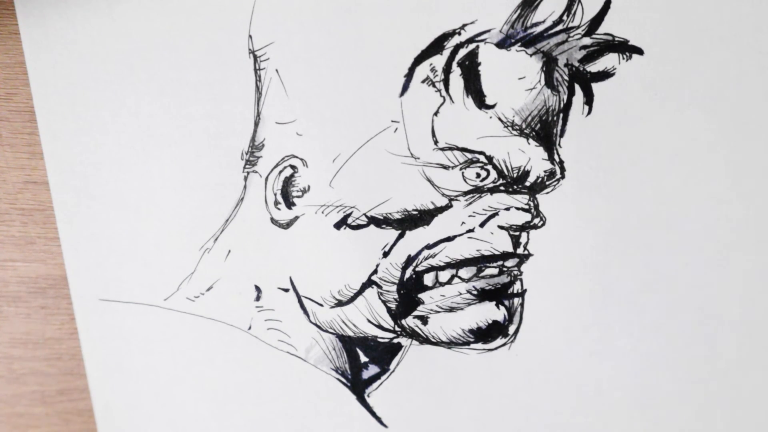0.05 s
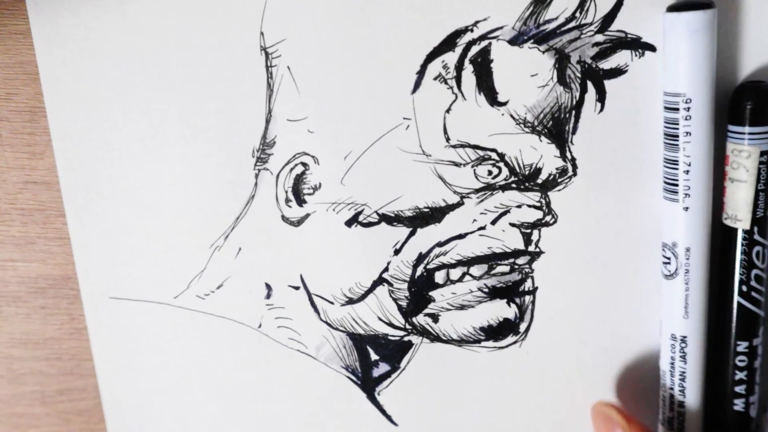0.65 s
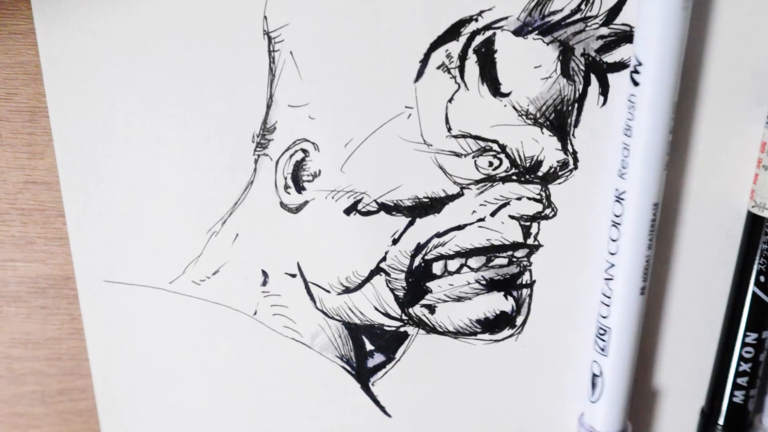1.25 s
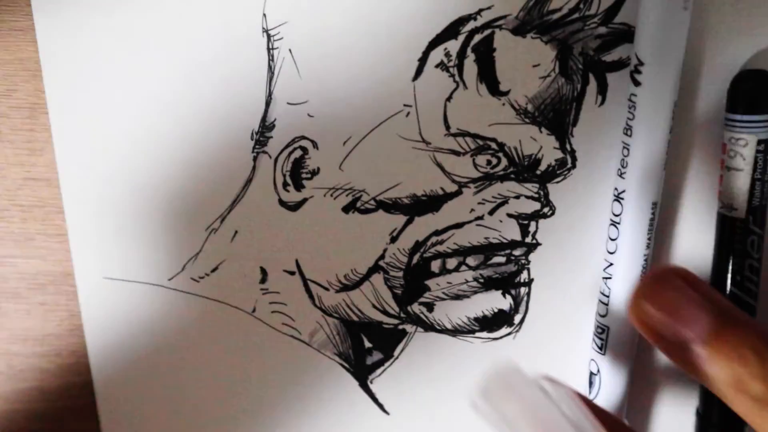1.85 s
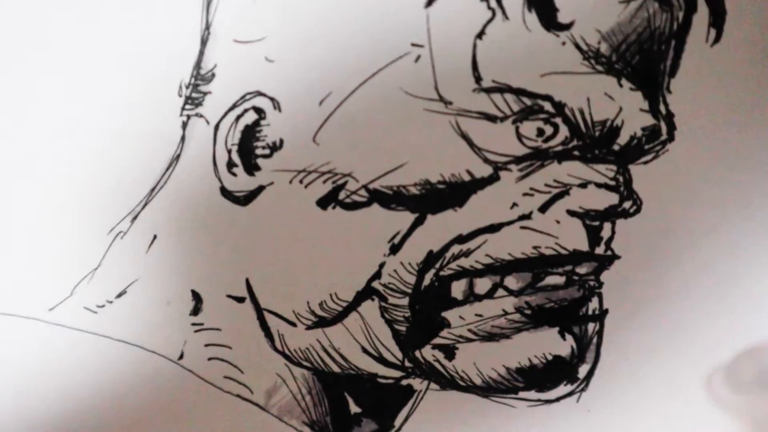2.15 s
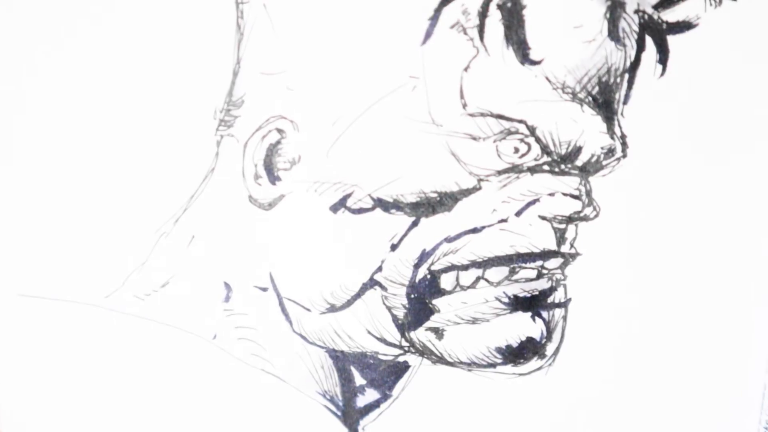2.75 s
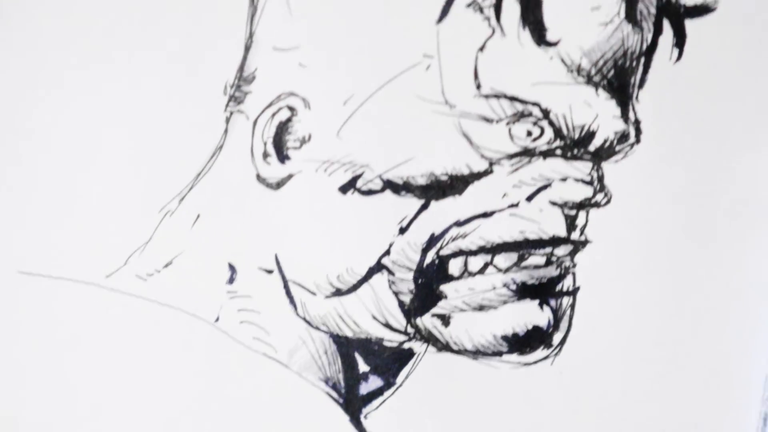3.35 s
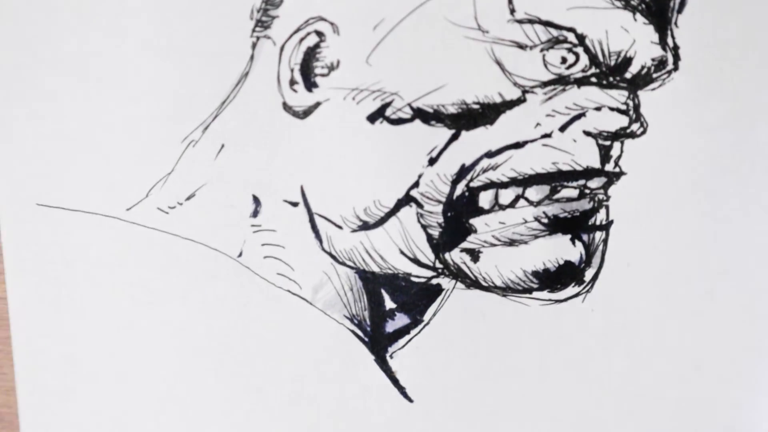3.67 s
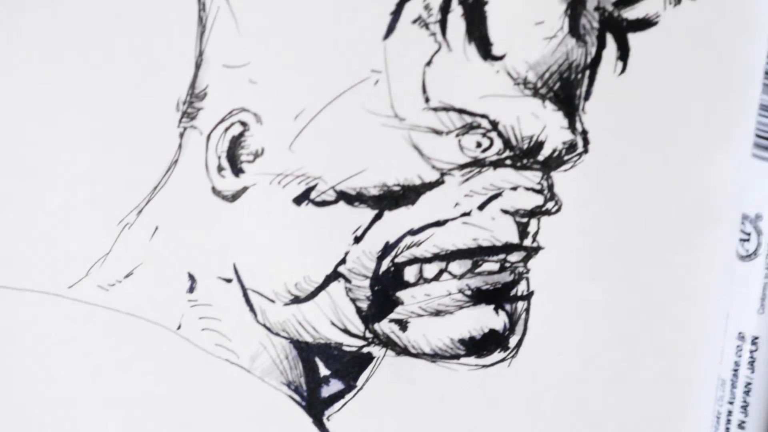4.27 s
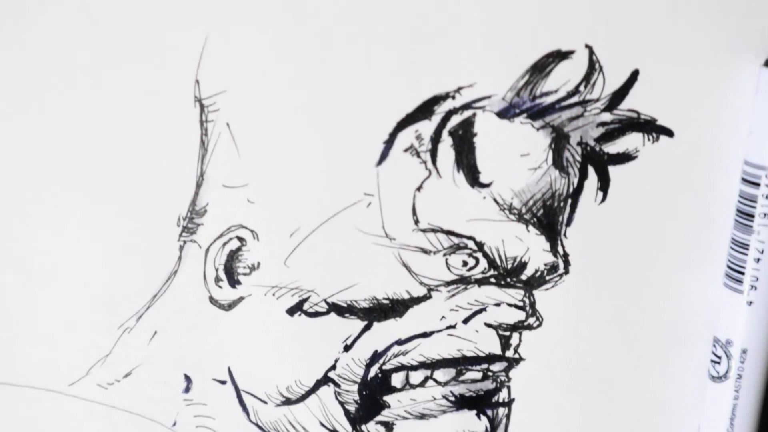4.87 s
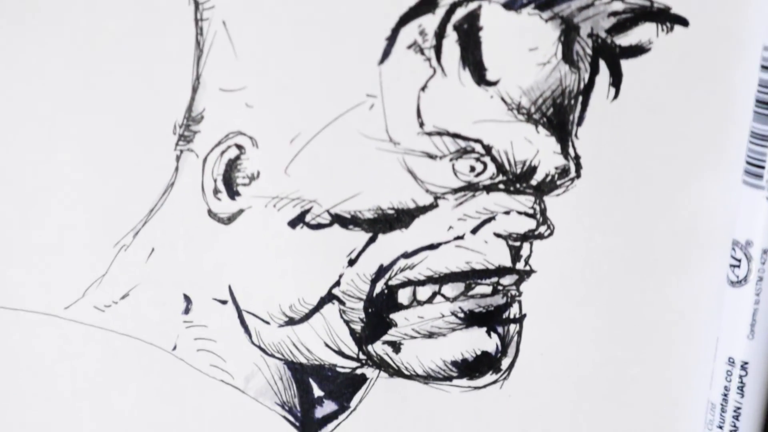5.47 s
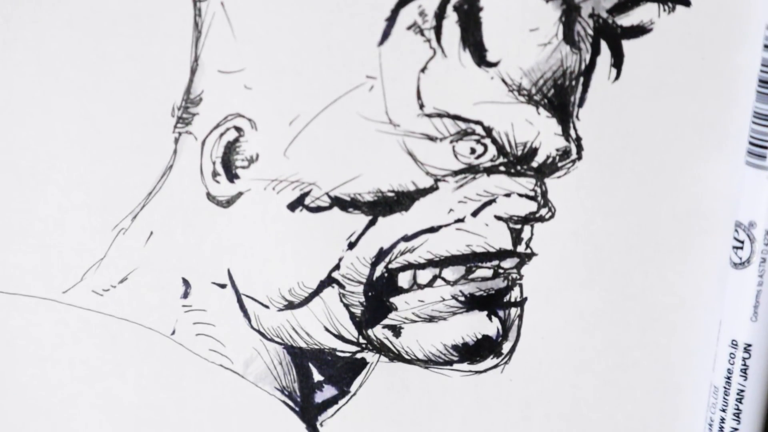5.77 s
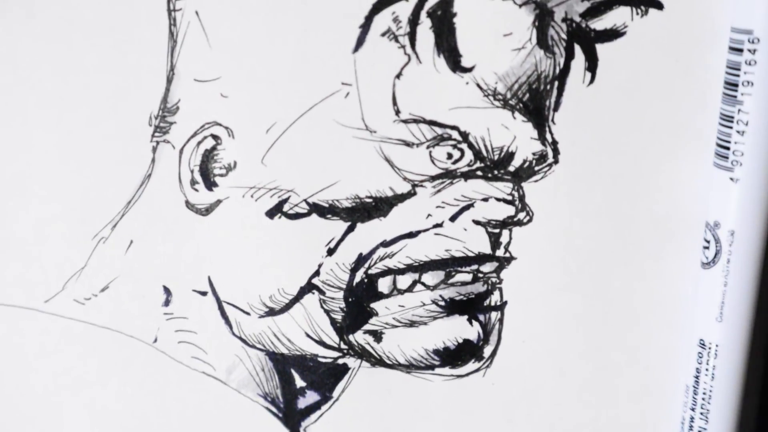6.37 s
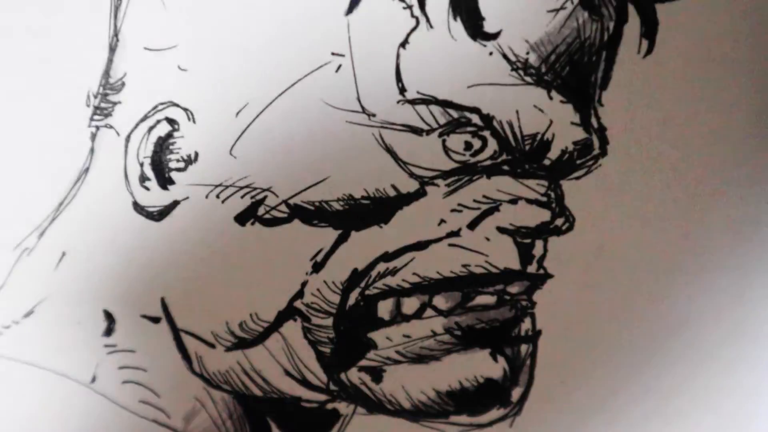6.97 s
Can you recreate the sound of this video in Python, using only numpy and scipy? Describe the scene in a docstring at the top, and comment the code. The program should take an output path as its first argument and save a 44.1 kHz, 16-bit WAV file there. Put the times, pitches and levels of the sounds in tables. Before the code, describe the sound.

A soft brush of paper opens the sound. From about 0.3 to 0.6 seconds, plastic pens clatter onto a sheet on a wooden desk, a quick run of woody knocks and bright clicks that is the loudest moment. Lighter taps follow until around 2 seconds as the pens are nudged. Between 1.4 and 2.9 seconds there are short gritty scrapes, dry finger swishes and tiny plastic creaks over a faint low rumble. At 3 seconds a click and a low thud come from a bumped stand. From about 3.3 to 6.4 seconds the sheet is pushed across the desk in several soft strokes, with a woody drone and a light hiss of fingers on paper. Near 6.8 to 7 seconds, low thuds and brief scrapes return as the pens are handled again. Everything is close and almost mono, in a small, quiet room.

```python
"""A soft brush of paper, then two plastic pens clatter onto a drawing sheet on a wooden desk: each blow
rings the wood and clicks in the barrel. The pens are nudged along with gritty scrapes and tiny creaks,
and a hand bumps a phone stand just above with low thuds. The sheet is pushed in short strokes, droning
through the desk top while fingers hiss over its fibres, and the pens are picked up again.
The room is small and quiet, the image almost mono."""
import sys
import numpy as np
from scipy import signal
from scipy.fft import rfft, irfft
from scipy.io import wavfile

SR = 44100
rng = np.random.default_rng(int(sys.argv[2]) if len(sys.argv) > 2 else 0)


def wrap_up_sound(samples):
    """Save the sound to the file named by the first command line argument, as 16-bit audio."""
    columns = np.atleast_2d(samples).T
    # keep every value between -1 and 1, then stretch to whole-number steps
    tamed = np.clip(columns, -1, 1)
    steps = np.round(tamed * 32767).astype(np.int16)
    wavfile.write(sys.argv[1], SR, steps)


N = 314212
TIME = np.arange(N) / SR
RING_TIME = TIME[:SR // 2]  # half a second for each hit to ring out

# Levels in the tables are relative: each layer sets its own gain on top.
# Knocks and clicks: pens hit the desk, and the phone stand clicks once at 2.67 s. Each row: start in
# seconds, knock level in dB, tick level in dB, contact hardness as a low-pass cutoff in Hz.
KNOCKS_AND_CLICKS = [(0.2885, -9, -22, 3660), (0.3181, -8.5, -9, 6950), (0.3329, -15.5, -22, 4000),
                     (0.3542, -11.5, -7.5, 5000), (.3610, -13.5, -25, 6500), (0.3871, -31, -10, 8000),
                     (0.4026, -2, -6.5, 2410), (0.413, -15, -14, 3000), (0.454, -36, -20, 6000),
                     (0.46, -2, -19, 5000), (.4729, -10.5, -16.5, 5000), (0.518, -16, -12, 5000),
                     (0.5241, -2.5, -10, 5700), (0.582, -47, -26.5, 5030), (0.6343, -32, -23.5, 3500),
                     (.6433, -37, -28, 2490), (.6520, -28, -37, 2000), (0.66, -48, -26, 3500),
                     (0.8355, -38, -27.5, 2200), (.8425, -20, -42, 780), (0.857, -25.5, -23.5, 1440),
                     (0.8873, -15, -25.5, 1800), (0.8934, -19, -40, 2870), (.8980, -20.5, -41, 2380),
                     (1.0334, -24, -25, 2970), (1.0349, -7, -24.5, 2620), (1.1422, -24, -25, 858),
                     (1.422, -26.5, -27.5, 1000), (1.8424, -43, -30, 4000), (1.8791, -11.5, -35, 2600),
                     (1.951, -40, -29.5, 1500), (1.993, -36, -29, 1500), (2.0660, -26.5, -50, 1000),
                     (2.284, -27, -50, 920), (2.6668, -20, -22.5, 700), (6.778, -30, -45, 700),
                     (6.961, -38, -38, 1200)]
# The ring of desk top and pen. Each row: pitch in Hz, level in dB, 60 dB decay time in seconds.
DESK_MODES = [(113, -12, .28), (283, -7, .19), (415, -4, .11), (540, -5, .11), (696, -1, .13),
              (826, -4, .13), (967, 1, .13), (1112, -2, .12), (1260, -7, .1), (1375, -6, .1),
              (1630, -1, .1), (1925, 1, .1), (2200, 1, .1), (2420, -1, .09), (2582, 0, .08), (2773, 1, .07),
              (2980, 1, .045), (3700, -4, .04), (4560, -5, .04), (5150, -9, .05), (5852, -6, .045)]
# The ping of the hollow barrel. Each row: pitch in Hz, level in dB, 60 dB decay time in seconds.
BARREL_MODES = [(2556, 13, 0.02), (3720, -1, 0.1), (4300, -5, 0.044), (5730, -7, .04)]
# The stand, shaken by a knock. Each row: pitch in Hz, level in dB, 60 dB decay time in seconds.
SHAKE_MODES = [(107.3, 7, 0.27), (675, 8, .15)]
# The tone of a knock's dense tail. Each row: frequency in Hz, level in dB.
TAIL_COLOUR = [(60, -20), (150, -17.5), (280, -8), (700, -9.5), (1400, -11), (2600, -10.5), (3500, -13.5),
               (5500, -12), (7000, -26), (15000, -43)]
# How long that tail hangs on. Each row: frequency in Hz, 60 dB decay time in seconds.
TAIL_DECAYS = [(200, 0.22), (800, 0.068), (3000, 0.073), (6000, 0.051), (14000, 0.14)]
# The bright click of cap and barrel. Each row: frequency in Hz, level in dB.
TICK_COLOUR = [(800, -50), (2800, -20), (4000, 9), (5200, -6), (7000, -2.5), (9000, -0.5), (10300, -0.5),
               (13500, 0), (16000, -12)]

# The stand or desk is bumped. Each row: start in seconds, level in dB, pitch in Hz,
# 60 dB decay time in seconds, attack in seconds.
BUMPS = [(1.414, -23.5, 138, 0.074, 0.0063), (1.990, -26, 119, 0.049, 0.0011),
         (2.624, -27.5, 114, 0.086, 0.0025), (3.001, -17, 94, 0.31, 0.0051), (3.257, -26, 157, 0.13, 0.015),
         (3.261, -18.5, 110, 0.2, 0.017), (6.751, -18, 77.4, 0.081, 0.016),
         (6.864, -28, 115, 0.081, 0.0076), (6.964, -19.5, 85, 0.062, 0.0074)]
# The stand's upper ring. Each row: pitch in Hz, level in dB, 60 dB decay time in seconds.
STAND_MODES = [(320, -16, 0.16), (397, -18, 0.12), (543, -20, 0.12), (677, -4.5, 0.11)]
# The hand leans on the stand and rocks it. Each row: start in seconds, level in dB.
LEANS = [(1.956, -33), (1.981, -28), (2.363, -29), (2.440, -25), (2.598, -27), (3.003, -24), (3.195, -30.5),
         (6.988, -25)]

# The sheet is pushed over the desk. Each row: start in seconds, length in seconds, drone level in dB,
# hiss level in dB, level in dB of the jolt as it breaks loose.
PUSHES = [(3.303, 0.034, -46.5, -67, -62), (3.418, 0.13, -43, -45, -69), (3.574, 0.093, -41, -61, -74),
          (3.72, 0.15, -50, -67, -65), (3.95, 0.77, -43, -53.5, -44.5), (4.74, 0.36, -45.5, -74, -57),
          (5.238, 0.44, -42.5, -48, -43.5), (6, 0.1, -44.5, -57, -40.5), (6.141, 0.15, -49.5, -70, -43.5),
          (6.322, 0.027, -50.5, -70, -68), (6.439, 0.02, -48, -52, -64)]
# Hand and pens shuffle on the sheet. Each row: peak time, rise and fall in seconds,
# drone level in dB, hiss level in dB.
SHUFFLES = [(.03, 0.12, 0.27, -58.5, -50.5), (.47, 0.063, 0.066, -36.5, -47),
            (.65, 0.043, 0.03, -43.5, -72), (1.14, 0.4, 0.18, -51, -50), (1.8, .03, 0.12, -42, -64),
            (2.15, 0.18, 0.78, -58, -52), (6.8, 0.036, 0.13, -45.5, -57), (7.12, 0.091, 0.13, -50, -52)]
# The woody drone of the sliding sheet. Each row: frequency in Hz, level in dB.
SLIDE_COLOUR = [(120, -19), (200, -28.5), (280, -4), (320, -10), (390, 1), (540, 1), (700, -1.5),
                (950, -10), (1100, -15.5), (1400, -18), (1750, -19), (2300, -27), (4000, -28), (15000, -33)]
# A narrow edge on that drone. Each row: centre in Hz, width in Hz, boost in dB.
SLIDE_RESONANCES = [(2890, 210, 12)]
# Short scrapes of pens and fingers. Each row: peak time, rise and fall in seconds, level in dB,
# brightness as a low-pass cutoff in Hz.
SCRAPES = [(1.462, 0.03, 0.011, -42, 5130), (1.530, 0.0091, 0.012, -43, 7000),
           (1.832, 0.034, 0.055, -34.5, 2180), (1.956, 0.0038, 0.017, -39, 1500),
           (2.004, 0.013, 0.039, -42, 5000), (2.180, 0.051, 0.018, -44, 2520),
           (2.226, 0.0074, 0.018, -41.5, 1800), (2.365, 0.033, 0.031, -42.5, 4500),
           (2.445, 0.014, 0.035, -45, 3000), (2.622, 0.029, 0.012, -37.5, 1680),
           (2.648, 0.0045, 0.0065, -38.5, 3500), (2.681, 0.0071, 0.0038, -36, 600),
           (2.773, 0.0083, 0.013, -43.5, 1370), (6.785, 0.017, 0.034, -33.5, 2400),
           (6.895, 0.017, 0.04, -41, 2000), (6.980, 0.013, 0.025, -43, 4500)]
# The grit of a scrape. Each row: frequency in Hz, level in dB.
SCRAPE_COLOUR = [(100, 5), (250, 4.5), (500, 4.5), (750, 2.5), (1100, -2.5), (2200, -7), (3300, -8),
                 (4200, -12), (6000, -17.5), (15000, -12)]

# The hiss of skin on paper. Each row: frequency in Hz, level in dB.
BRUSH_COLOUR = [(500, 4.5), (1200, 10), (2000, 11), (3000, 12), (4500, 9.5), (6500, 7.5), (9000, 7),
                (13500, 2.5), (16000, -2.5)]
# Dry swishes of skin and barrel. Each row: peak time, rise and fall in seconds, level in dB,
# centre of the sheen in Hz.
SWISHES = [(1.465, .022, 0.0081, -52, 12000), (1.565, 0.072, 0.065, -49, 13800),
           (1.730, 0.046, 0.043, -48.5, 5570), (2.025, 0.025, 0.0053, -51.5, 10500),
           (2.830, 0.014, 0.016, -54, 5570), (2.890, 0.02, 0.013, -43, 12000),
           (3.315, 0.0091, 0.0073, -54.5, 5560), (3.490, 0.092, 0.074, -50.5, 12200),
           (6.765, 0.0078, 0.012, -47, 7500), (6.980, 0.013, 0.013, -55.5, 7500)]
# Hollow fingertip rubs. Each row: peak time, rise and fall in seconds, level in dB.
RUBS = [(3.61, 0.026, 0.035, -55), (3.73, 0.042, 0.057, -51.5), (3.83, 0.018, 0.037, -57),
        (6.61, 0.0058, 0.0088, -56), (6.73, 0.088, 0.022, -53.5), (6.985, .012, 0.011, -51.5)]
# The hollow under the arched hand. Each row: centre in Hz, width in Hz, gain in dB.
RUB_RESONANCES = [(2550, 160, 9), (4400, 240, 9), (6500, 320, 4), (7300, 280, -2)]
# The woody click of a fingernail. Each row: frequency in Hz, level in dB.
NAIL_COLOUR = [(500, 5), (1100, 7), (1600, 3), (2300, 5), (2800, 0), (4000, -7.5), (8000, -11),
               (11000, -8.5), (16000, -20)]
# Gripped plastic creaks. Each row: peak time, rise and fall in seconds, level in dB, pitch in Hz.
CREAKS = [(2.621, 0.0036, 0.0042, -36, 1700), (2.646, 0.0022, 0.0049, -38.5, 2010),
          (2.669, 0.0009, 0.0046, -62, 3940), (6.763, 0.0046, 0.0072, -65, 5760),
          (6.809, .002, .003, -44, 2870)]
# The whistle of rubbed plastic. Each row: pitch in Hz, level in dB.
SQUEAK_PARTIALS = [(14000, -61), (15450, -66)]

# The hand rests on the desk and the stand sways. Each row: start and end in seconds, level in dB.
HAND_RESTS = [(0, 0.02, -45), (0.355, 1.364, -51), (1.382, 2.91, -47), (3.208, 3.403, -47.5),
              (3.694, 3.95, -56), (5.95, 6.4, -63), (6.745, 7.13, -42)]
# The rumble of that sway. Each row: frequency in Hz, level in dB.
SWAY_COLOUR = [(18, 4), (32, -45), (48, -0.5), (80, -0.5), (112, 0), (170, -11.5), (300, -22), (800, -61)]
# The room tone. Each row: frequency in Hz, level in dB.
ROOM_COLOUR = [(18, -45), (30, -47), (64, -16), (134, -4.5), (303, -7.5), (486, -9.5), (866, -9.5),
               (1460, -17), (1720, -11), (1860, -19), (2830, -17), (4190, -25), (11100, -28), (16000, -28)]
# Echoes off nearby walls and furniture. Each row: delay in seconds, level in dB.
REFLECTIONS = [(.00718, -17), (.0095, -31), (0.0144, -32), (0.0141, -19)]
# Faint stereo noise that differs between left and right and slowly fades.
# Each row: frequency in Hz, level in dB.
WIDTH_COLOUR = [(40, -15), (150, -3.5), (300, 2), (650, 0.5), (900, -17), (2500, -24), (5000, -18),
                (9000, -17), (15000, -23)]

RATTLE_T60_S, JOLT_ATTACK_S = 0.06, 0.001


def undb(db):
    """Decibels to gain."""
    return 10 ** (np.asarray(db) / 20)


def unit(x):
    """Scale to rms 1."""
    return x / np.sqrt(np.mean(x ** 2))


def at_hz(points, hz):
    """Read (Hz, value) points on a log-frequency axis."""
    centres, values = np.transpose(points)
    return np.interp(np.log(np.maximum(hz, 1)), np.log(centres), values)


def colour(x, points):
    """EQ by a (Hz, dB) curve."""
    return irfft(rfft(x) * undb(at_hz(points, np.fft.rfftfreq(len(x), 1 / SR))), len(x))


def resonate(x, resonances):
    """EQ by a few (Hz, width Hz, dB) bells."""
    hz = np.fft.rfftfreq(len(x), 1 / SR)
    bells_db = sum(db / (1 + (2 * (hz - centre) / width) ** 2) for centre, width, db in resonances)
    return irfft(rfft(x) * undb(bells_db), len(x))


def cut(x, hz, kind, order=2):
    """Low-pass or high-pass."""
    return signal.sosfilt(signal.butter(order, hz, kind, fs=SR, output="sos"), x)


def fade(t60):
    """Exponential decay, 60 dB down after t60 seconds."""
    return np.exp(-np.log(1000) * RING_TIME / t60)


def hold(start, end, attack, release):
    """Attack, hold, release envelope."""
    return np.clip((TIME - start) / attack, 0, 1) * np.exp(-np.maximum(TIME - end, 0) / release)


def stroke(peak, rise, fall):
    """Speed of a short movement: it swells to a peak and stops."""
    return np.exp(-.5 * ((TIME - peak) / np.where(TIME < peak, rise, fall)) ** 2)


def walk(rate):
    """Smooth random wander of rms 1."""
    knots = rng.standard_normal(2048)
    return unit(np.interp(TIME * rate, np.arange(len(knots)), knots))


def add(track, start_s, sound):
    """Mix a sound into the track."""
    start = max(int(start_s * SR), 0)
    track[start:start + len(sound)] += sound[:max(N - start, 0)]


def noise(points, length=N):
    """Coloured noise of rms 1."""
    return unit(colour(rng.standard_normal(length), points))


def ring(modes, scatter_db, detune):
    """Damped modes; each point of contact weights them differently."""
    out = np.zeros(len(RING_TIME))
    for hz, db, t60 in modes:
        loudness, tuning, polarity = rng.standard_normal(3)
        tone = np.sin(2 * np.pi * hz * (1 + detune * tuning) * RING_TIME)
        out += np.sign(polarity) * undb(db + scatter_db * loudness) * fade(t60) * tone
    return out


def friction(points, grain_db, grain_samples=32):
    """Countless tiny slips of uneven size, heard through a body's colour."""
    slips_db = grain_db * np.clip(rng.standard_normal(N // grain_samples + 1), -2, 2)
    sizes = np.repeat(undb(slips_db), grain_samples)[:N]
    return unit(colour(rng.standard_normal(N) * sizes, points))


def knocks_and_clicks(contact_s=0.00095, heavy_db=2, tick_t60=0.0061, shake_build_s=0.018):
    """Pen hits and one stand click: each punches and rings the desk, ticks and shakes the stand."""
    out = np.zeros(N)
    punch = (1 - 2 * RING_TIME / contact_s) * (RING_TIME < contact_s)
    build = np.minimum(RING_TIME / contact_s, 1)  # the ring builds while the contact lasts
    shake_build = np.minimum(RING_TIME / shake_build_s, 1)
    for start, knock_db, tick_db, hardness_hz in KNOCKS_AND_CLICKS:
        # A brief, hard contact gives the desk little bass; a heavy blow reaches deeper.
        weight = undb(knock_db - heavy_db)
        bass_edge_hz = (130 + 0.043 * hardness_hz) / (1 + weight ** 2)
        wood = undb(-26) * ring(DESK_MODES, scatter_db=2, detune=.002) + undb(-10.5) * knock_tail()
        knock = cut(punch + build * wood, hardness_hz, "low")
        knock = cut(knock, bass_edge_hz, "high", order=1)
        tick = noise(TICK_COLOUR, len(RING_TIME)) * (fade(tick_t60) + undb(-23) * fade(RATTLE_T60_S))
        ping = undb(-22) * ring(BARREL_MODES, scatter_db=3, detune=.01)
        shake = undb(-26) * min(weight, 1) * shake_build * ring(SHAKE_MODES, scatter_db=1, detune=.002)
        add(out, start, undb(knock_db) * (knock + shake) + undb(tick_db - 6.5) * (tick + ping))
    return cut(out, 55, "high")  # the desk top radiates little below its first mode


def knock_tail():
    """Crowded desk modes and near reflections blur into noise; the bass hangs on longest."""
    length = len(RING_TIME)
    spectrum = rfft(noise(TAIL_COLOUR, length))
    hz = np.fft.rfftfreq(length, 1 / SR)
    centres, t60s = np.transpose(TAIL_DECAYS)
    bands = [at_hz(np.transpose([centres, solo]), hz) for solo in np.eye(len(centres))]
    return sum(irfft(spectrum * band, length) * fade(t60) for band, t60 in zip(bands, t60s))


def stand_bumps(quick_s=0.0045, firm_db=-17):
    """Low thuds carried up the stand; the quicker and firmer the push, the more its upper modes ring."""
    out = np.zeros(N)
    rock_hz, rock_t60, rock_attack_s = 41, 0.39, 0.0087  # the stand's lowest tone
    jolt_hz, jolt_t60 = 111, 0.36  # the sheet breaking loose
    rocks = [(start, db, rock_hz, rock_t60, rock_attack_s) for start, db in LEANS]
    jolts = [(start, db, jolt_hz, jolt_t60, JOLT_ATTACK_S) for start, _, _, _, db in PUSHES]
    for start, db, hz, t60, attack in BUMPS + rocks + jolts:
        thud = np.sin(2 * np.pi * hz * RING_TIME) * fade(t60)
        reach = min(quick_s / attack, 1) ** 2 * min(undb(db - firm_db), 1)
        upper = reach * ring(STAND_MODES, scatter_db=2, detune=.004)
        add(out, start, undb(db) * (thud + upper) * np.minimum(RING_TIME / attack, 1))
    return out


def push_speed(start, length, start_speed=0.53, skew=0.91):
    """The sheet breaks loose at a share of its top speed, speeds up, slows and stops."""
    progress = np.clip((TIME - start) / length, 0, 1) ** skew
    swell = start_speed + (1 - start_speed) * np.sin(np.pi * progress) ** 2
    return swell * hold(start, start + length, attack=0.0047, release=0.025)


def paper_slide(flutter_db=0.23):
    """Sliding drones through the desk top, unevenly as the sheet catches and slips."""
    level = sum(undb(db) * stroke(peak, rise, fall) for peak, rise, fall, db, _ in SHUFFLES)
    for start, length, drone_db, _, jolt_db in PUSHES:
        level += undb(drone_db) * push_speed(start, length)
        level += undb(jolt_db - 4) * hold(start, start, JOLT_ATTACK_S, release=0.013)
    drone = unit(resonate(friction(SLIDE_COLOUR, grain_db=1), SLIDE_RESONANCES))
    return drone * level * undb(flutter_db * walk(35))


def scrapes(flutter_db=1.2):
    """Gritty stick and slip of plastic and fingertips dragged over the sheet."""
    grit = friction(SCRAPE_COLOUR, grain_db=3.5) * undb(flutter_db * walk(110))
    return sum(undb(db) * unit(cut(grit, hz, "low", order=1)) * stroke(peak, rise, fall)
               for peak, rise, fall, db, hz in SCRAPES)


def fingers(hiss_power=5.5, hiss_floor_db=-61.5, sheen_db=7, flutter_db=0.78):
    """Skin on the paper fibres: a dry hiss, hollow where the hand arches over it."""
    # The hiss grows much faster with speed than the drone does.
    motion = sum(undb(db) * push_speed(start, length) ** hiss_power for start, length, _, db, _ in PUSHES)
    motion += sum(undb(db) * stroke(peak, rise, fall) for peak, rise, fall, _, db in SHUFFLES)
    hiss = undb(-5) * friction(BRUSH_COLOUR, grain_db=2.5) * np.hypot(motion, undb(hiss_floor_db))
    fibres = friction(BRUSH_COLOUR, grain_db=2)
    swishes = sum(undb(db) * stroke(peak, rise, fall) * unit(resonate(fibres, [(hz, hz / 4, sheen_db)]))
                  for peak, rise, fall, db, hz in SWISHES)
    rubbing = sum(undb(db) * stroke(peak, rise, fall) for peak, rise, fall, db in RUBS)
    hollow = unit(resonate(fibres, RUB_RESONANCES)) * rubbing
    return (hiss + swishes + hollow) * undb(flutter_db * walk(37))


def fingernail(start_s=2.9988, level_db=-25, click_t60=0.021):
    """A nail clicks on the stand as the hand lets go: short and woody, with a faint rattle."""
    out = np.zeros(N)
    click = noise(NAIL_COLOUR, len(RING_TIME)) * (fade(click_t60) + undb(-21) * fade(RATTLE_T60_S))
    add(out, start_s, undb(level_db) * click)
    return out


def creaks(waver=0.081):
    """For a moment the slips of gripped plastic fall into step and give a rough pitch."""
    out = np.zeros(N)
    for peak, rise, fall, db, hz in CREAKS:
        cycles = np.cumsum(hz * (1 + waver * walk(280))) / SR
        out += undb(db) * stroke(peak, rise, fall) * np.sin(2 * np.pi * cycles)
    return out


def squeak(start_s=2.325, length_s=0.15, waver=0.013, jitter=0.003):
    """A thin, unsteady whistle of rubbed plastic."""
    wobbly_time = np.cumsum(1 + waver * walk(35) + jitter * walk(200)) / SR
    tone = sum(undb(db) * np.sin(2 * np.pi * hz * wobbly_time) for hz, db in SQUEAK_PARTIALS)
    return tone * hold(start_s, start_s + length_s, attack=0.012, release=0.012)


def stand_sway(floor_db=-60.5):
    """The swaying stand rumbles, louder while the hand rests on the desk."""
    rests = [undb(db) * hold(start, end, attack=0.01, release=0.077) for start, end, db in HAND_RESTS]
    return noise(SWAY_COLOUR) * np.hypot(np.max(rests, axis=0), undb(floor_db))


def early_echoes(x, dull_hz=6000):
    """The direct sound plus a few dulled bounces off walls and furniture."""
    out, dull = x.copy(), cut(x, dull_hz, "low", order=1)
    for delay, db in REFLECTIONS:
        add(out, delay, undb(db) * dull)
    return out


def room_reverb(x, t60=0.11, wet_db=-22, dull_hz=2200, predelay_s=0.01):
    """The faint late wash of a small furnished room."""
    echo = cut(rng.standard_normal(len(RING_TIME)), dull_hz, "low") * fade(t60) * (RING_TIME > predelay_s)
    return undb(wet_db) * signal.fftconvolve(x, echo / np.linalg.norm(echo))[:N]


def room_tone(level_db=-54):
    """A steady bed of still room air."""
    return undb(level_db) * noise(ROOM_COLOUR)


def scene(width_db=-56.5, width_fall_db_per_s=3, phase_width_db=-37):
    """All sources in the centre; fading stereo noise and a slight phase shift add a trace of width."""
    desk = early_echoes(knocks_and_clicks() + fingernail() + scrapes() + creaks() + paper_slide())
    mid = desk + room_reverb(desk) + stand_bumps() + fingers() + squeak() + room_tone() + stand_sway()
    side = noise(WIDTH_COLOUR) * undb(width_db - width_fall_db_per_s * TIME)
    side += undb(phase_width_db) * np.imag(signal.hilbert(mid))
    return np.array([mid + side, mid - side])


def record(dry, top_hz=15900):
    """Clip the peaks at full scale and cut the very top steeply."""
    low_pass = signal.ellip(10, .2, 80, top_hz, fs=SR, output="sos")
    return signal.sosfilt(low_pass, np.clip(dry, -1, 1))


dry = scene()
out = record(dry)
wrap_up_sound(out)
```